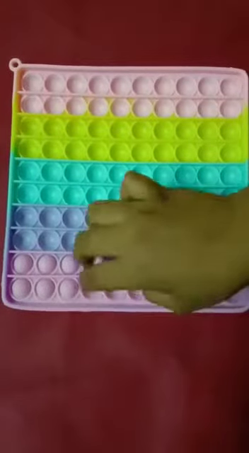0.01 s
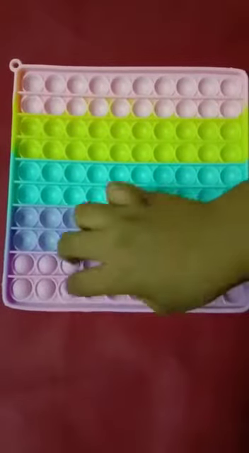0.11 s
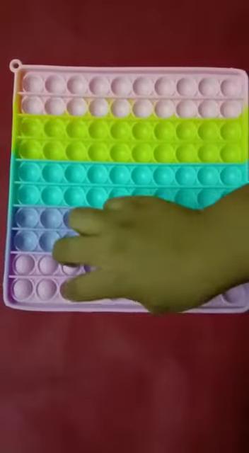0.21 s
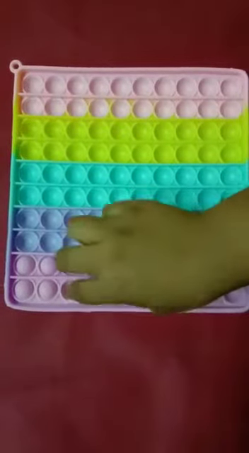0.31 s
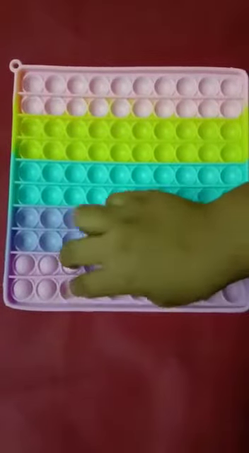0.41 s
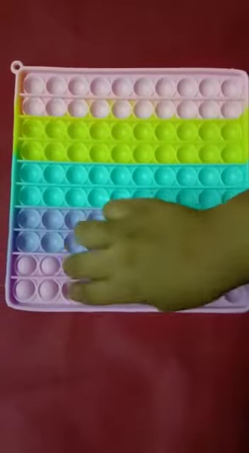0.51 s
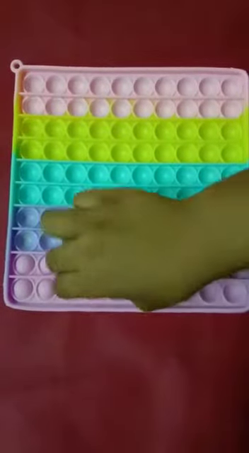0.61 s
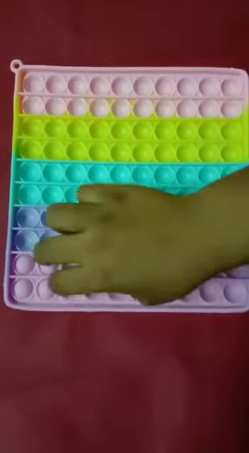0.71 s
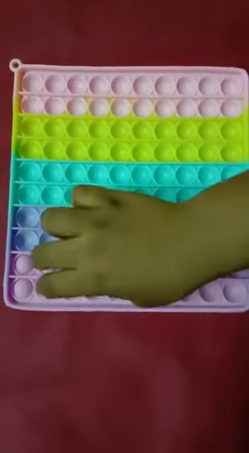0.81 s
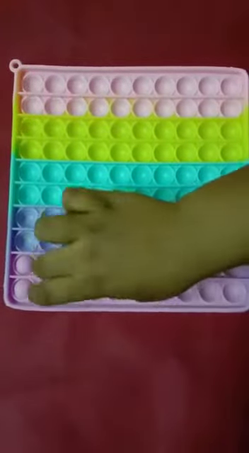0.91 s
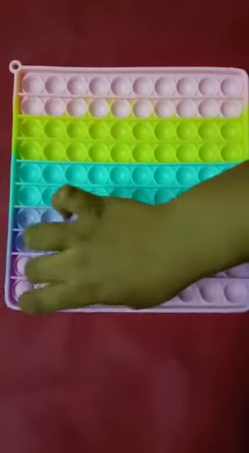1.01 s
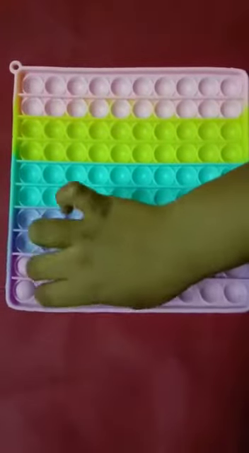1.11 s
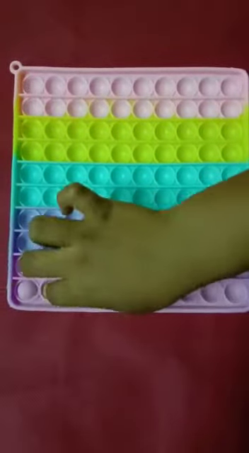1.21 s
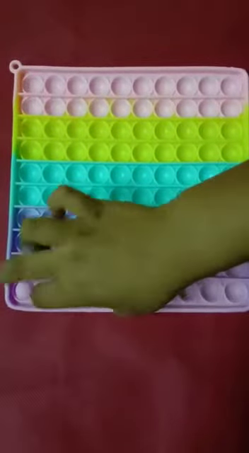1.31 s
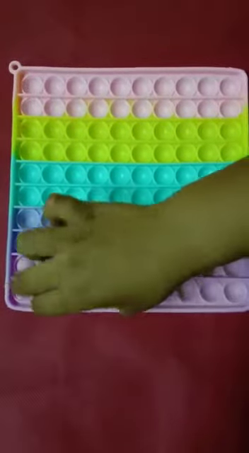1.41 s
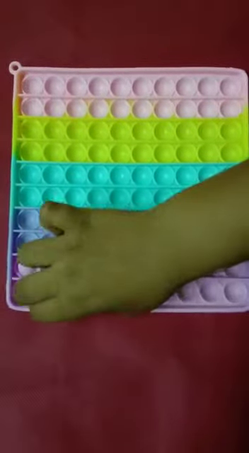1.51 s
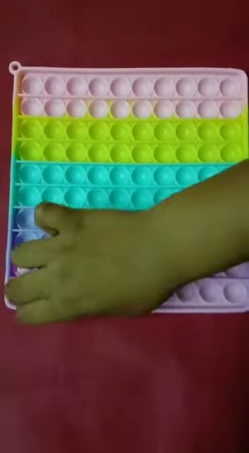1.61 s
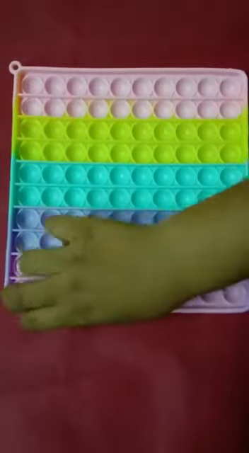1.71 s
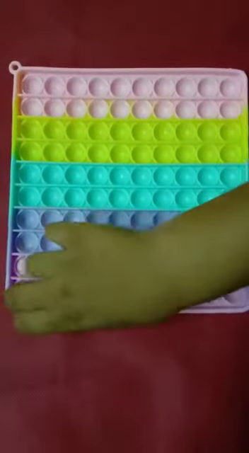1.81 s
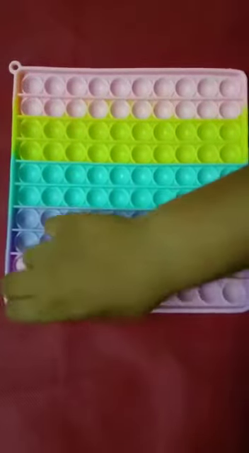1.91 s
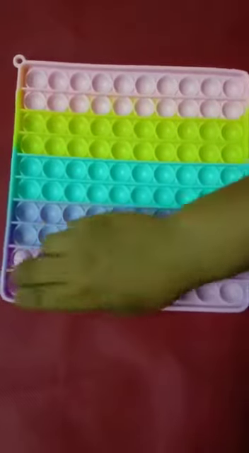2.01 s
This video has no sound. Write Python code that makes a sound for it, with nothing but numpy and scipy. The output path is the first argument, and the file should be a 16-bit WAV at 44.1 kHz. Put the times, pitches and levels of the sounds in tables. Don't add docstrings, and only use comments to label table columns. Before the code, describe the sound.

Five sharp pops of a silicone bubble toy pressed by fingers in a small room

```python
import sys
import numpy as np
from scipy import signal
from scipy.fft import rfft, irfft, next_fast_len
from scipy.io import wavfile
from scipy.ndimage import uniform_filter1d, map_coordinates

SR = 44100
rng = np.random.default_rng(int(sys.argv[2]) if len(sys.argv) > 2 else 0)


def generate_wav(sig):
    pcm = np.round(np.clip(np.atleast_2d(sig).T, -1, 1) * 32767).astype(np.int16)
    wavfile.write(sys.argv[1], SR, pcm)


def linear_from_db(decibels):
    return 10 ** (np.asarray(decibels, float) / 20)


N = 92610

# pitch_hz, level_db
RUMBLE_SPECTRUM = [(12, 5), (20, -27), (22, -37), (58, -25.5), (75, -4.5), (134, -4.5), (173, -12),
                   (318, -13.5), (700, -22.5), (910, -39), (1540, -120)]
# time_s, level_db
RUMBLE_LEVEL = [(0.0, -58), (0.4, -56.5), (0.99, -56), (1.65, -56), (1.96, -57), (2.1, -57.5)]
# pitch_hz, level_db
HISS_SPECTRUM = [(350, -30), (600, -4), (1610, -1.5), (1880, -1), (2680, -3), (3300, -3), (3780, -5),
                 (13900, -13.5), (16000, -8)]
# pitch_hz, level_db
PORT_SPECTRUM = [(12, -41.5), (20, -9.5), (286, -4.5), (1460, -16), (5530, -16.5), (6720, -18),
                 (7510, -58.5), (11400, -41.5), (15000, -46.5)]
# start_s, level_db, pitch_ratio, rebound_db, crackle_db
POPS = [
    (.2338, 0.5, 0.98, -15, -43.5),
    (.5234, -7, 0.96, -18, -48),
    (.9326, -1.5, 1.004, -7, -34),
    (1.1710, -3.5, 1.029, -38, -35.5),
    (1.8279, -12, 0.97, -19, -28),
]
TOUCH = [(-7.5, -9, 1, 0, -20), (0, -5.5, -0.35, -4, -8), (-1.5, -6, 1, 0, -33),
         (-3, -8.5, -4.3, -20.5, -27.5), (-2, -9, -0.8, -14, -4)]
# pitch_hz, t60_s, level_db
DOME_MODES = [(1075, .045, 0), (2280, .03, 0), (2830, .034, 0), (3800, .034, 0), (4600, .03, 0),
              (1330, .03, -6), (1740, .03, -1), (3350, .02, -17), (4200, .02, -14), (5200, .025, -6)]
NEAR_WALL_S = [.0104, .0104, .0104, .0088, .0102]
# extra_delay_s, level_db
FAR_WALLS = [(.0031, -4), (.0085, -7)]
# wall_db, room_db, room_t60_s, room_tilt_db_per_octave
ANSWERS = [
    (-24, -24, 0.29, 3.5),
    (-10, -20.5, 0.2, 0),
    (-15, -21, 0.24, -1.5),
    (-12.5, -30, 0.27, -4),
    (-12, -30.5, 0.21, -1.5),
]
# pitch_hz, level_db
ROOM_SPECTRUM = [(260, -62.5), (450, -25), (993, 1), (1510, 2), (1930, 6), (2550, 2), (3890, 1.5),
                 (4420, -1.5), (9500, -64.5), (12400, -129.5), (20900, -120)]
# start_s, level_db, pitch_hz, t60_s
THUDS = [(.234, -41, 184, .05), (.524, -48, 293.4, 0.12), (.535, -35.5, 108.5, 0.095),
         (.933, -43.5, 170, 0.087), (.933, -58.5, 303, 0.029), (1.171, -27.5, 299, 0.039),
         (1.171, -31, 650, .035), (1.828, -25.5, 171, 0.04), (1.828, -34.5, 460, 0.041),
         (1.84, -45.5, 67, 0.26), (.524, -42.5, 560, .03), (.234, -47, 600, .02), (.933, -48, 600, .02)]
# start_s, level_db, pitch_hz, t60_s
TICKS = [
    (.6350, -50, 3800, .012),
    (.6350, -54, 2900, .014),
    (.6350, -54, 4700, .012),
    (.660, -58, 3700, .03),
    (1.2728, -50, 3800, .016),
    (1.2728, -52, 1050, .03),
    (1.3055, -48, 3850, .022),
    (1.7730, -50, 2200, .018),
]
# middle_s, level_db, pitch_hz, rise_s, fall_s
RUBS = [(.848, -56, 2900, .008, .006), (.843, -58, 3800, .008, .004), (.848, -61, 5200, .01, .006),
        (1.454, -51, 4300, .009, .004), (1.453, -52, 2800, .011, .005), (1.71, -62, 4500, .012, .012),
        (1.71, -62, 2800, .01, .01), (1.98, -61, 1000, .015, .015), (2.05, -62, 1830, .012, .012),
        (1.385, -61, 1850, .012, .012)]
ATTACK_S, SWELL_S, START_SHARE = .00035, .0008, .62
FREE_S, DAMP_S, DAMPED_DB, REBOUND_S = .003, .0005, -17, .00117
CREST_S, LEAN = .00028, 1.1
LEAD_S = .003
VOICE_LOW_HZ, VOICE_HIGH_HZ = 710, 6370
CRACKLE_HZ, CRACKLE_T60 = 7500, 0.013
ROOM_START_S, ROOM_RISE_S, TREBLE_DIES_S = .0075, .004, 0.34
GATE_DB = -43
ROOM_KEEPS = 0.067
FLOOR_TOP_HZ = 15500


def unit(x):
    return x / np.sqrt(np.mean(x ** 2) + 1e-20)


def along(points, hz):
    f, v = np.transpose(points)
    return np.interp(np.log(hz + 1), np.log(f + 1), v)


def filtered(x, response):
    m = next_fast_len(len(x) + 8192)
    return irfft(rfft(x, m) * response(np.fft.rfftfreq(m, 1 / SR)), m)[:len(x)]


def peak(f, hz, width):
    return 1j * f * width / (hz * hz - f * f + 1j * f * width)


def bump(f, hz, width):
    return np.exp(-((f - hz) / width) ** 2)


def delayed(x, s):
    return np.pad(x, (round(s * SR), 0))[:len(x)]


def wobble(rate):
    knots = rng.standard_normal(int(N * rate / SR) + 4)
    return map_coordinates(knots, [np.arange(N) * rate / SR])


def rush(spectrum, patchy_db):
    z = signal.stft(rng.standard_normal(N), nperseg=512)[2]
    patches = uniform_filter1d(rng.standard_normal(z.shape), size=5, axis=0)
    patches = uniform_filter1d(patches, size=8, axis=1)
    x = signal.istft(z * linear_from_db(patchy_db * unit(patches)), nperseg=512)[1][:N]
    return unit(filtered(x, lambda f: linear_from_db(along(spectrum, f))))


def add(out, s, x):
    part = out[round(s * SR):][:len(x)]
    part += x[:len(part)]


def room_tone():
    t = np.arange(N) / SR
    rumble_db = np.interp(t, *np.transpose(RUMBLE_LEVEL)) + .8 * wobble(14)
    rumble = linear_from_db(rumble_db) * rush(RUMBLE_SPECTRUM, patchy_db=1.3)
    hiss = filtered(rush(HISS_SPECTRUM, patchy_db=2.33), lambda f: f < FLOOR_TOP_HZ)
    hiss = linear_from_db(-60 + .6 * wobble(3.1)) * hiss
    whine = linear_from_db(-75 + 5 * wobble(11)) * np.sin(2 * np.pi * 1820 * t + 3 * wobble(22))
    side = linear_from_db(-65) * rush(PORT_SPECTRUM, patchy_db=2.4)
    return rumble + hiss + whine + np.array([side, -side])


def dome_snap(t, modes, rebound_db, crackle_db):
    ring = sum(linear_from_db(g - 60 * t / t60) * np.cos(2 * np.pi * hz * (t - CREST_S) + LEAN) for hz, t60, g in modes)
    ring = ring * np.sin(np.pi / 2 * np.minimum(t / ATTACK_S, 1)) ** 2
    ring = ring * (1 - START_SHARE * np.exp(-t / SWELL_S))
    damping = linear_from_db(DAMPED_DB) + 1 / (1 + np.exp(np.minimum((t - FREE_S) / DAMP_S, 50)))
    snap = damping * (ring + linear_from_db(rebound_db) * delayed(ring, REBOUND_S))

    def voice_band(f):
        return 1 / (1 + (f / VOICE_HIGH_HZ) ** 14) / (1 + (VOICE_LOW_HZ / (f + 1)) ** 8)

    snap = filtered(delayed(snap, LEAD_S), voice_band)
    crackle = linear_from_db(-60 * t / CRACKLE_T60) * rng.standard_normal(len(t))
    crackle = filtered(delayed(crackle, LEAD_S), lambda f: bump(f, CRACKLE_HZ, 1300))
    return snap / np.abs(snap).max() + linear_from_db(crackle_db + 10) * crackle


def wall_echo(snap, near_s, wall_db):
    walls = [(0.0007, 0.056)] + FAR_WALLS
    return filtered(snap, lambda f: linear_from_db(wall_db) * sum(
        linear_from_db(g) * np.exp(-2j * np.pi * f * (near_s + d)) for d, g in walls))


def room_answer(t, modes, room_db, t60, tilt_db):
    level = linear_from_db(room_db - 60 * t / t60)
    onset = 0.48 * np.minimum(t / FREE_S, 1)
    level *= np.clip((t - ROOM_START_S) / ROOM_RISE_S, onset, 1)
    level /= 1 + linear_from_db(GATE_DB + 60 * t / t60 - room_db) ** 3

    def colour(f):
        tint = sum(linear_from_db(g) * np.abs(peak(f, hz, 510)) for hz, _, g in modes) ** ROOM_KEEPS
        return tint * linear_from_db(along(ROOM_SPECTRUM, f) + tilt_db * np.log2((f + 50) / 2000))

    air = unit(filtered(rng.standard_normal(len(t)), colour))
    dull = unit(filtered(air, lambda f: 1 / (1 + 1j * f / 1500)))
    bright_share = np.exp(-t / TREBLE_DIES_S)
    return level * (bright_share * air + (1 - bright_share) * dull)


def pops():
    out, t = np.zeros(N), np.arange(SR // 4) / SR
    for pop, touch, near_s, answer in zip(POPS, TOUCH, NEAR_WALL_S, ANSWERS):
        s, db, ratio, rebound_db, crackle_db = pop
        wall_db, room_db, t60, tilt_db = answer
        shares = list(touch) * 2
        modes = [(ratio * hz, life, g + share) for (hz, life, g), share in zip(DOME_MODES, shares)]
        snap = linear_from_db(db) * dome_snap(t, modes, rebound_db, crackle_db)
        add(out, s - LEAD_S, snap + wall_echo(snap, near_s, wall_db))
        add(out, s, room_answer(t, modes, room_db, t60, tilt_db))
    return out


def table():
    out, t = np.zeros(N), np.arange(SR // 4) / SR
    for s, db, hz, t60 in THUDS:
        add(out, s, linear_from_db(db - 60 * t / t60) * np.sin(2 * np.pi * hz * t) * (1 - np.exp(-t / .002)))
    noise = rng.standard_normal(len(t))
    bright = unit(filtered(noise, lambda f: peak(f, 12800, 6000) ** 2 * (f < FLOOR_TOP_HZ)))
    burst = linear_from_db(9 - 60 * t / .02) * (1 - np.exp(-t / .001))
    add(out, 1.828, linear_from_db(-60) * (linear_from_db(-60 * t / .25) + burst) * bright)
    return out


def skin():
    out, t = np.zeros(N), np.arange(SR // 10) / SR
    rise_in = 1 - np.exp(-t / .0007)
    for s, db, hz, t60 in TICKS:
        grit = unit(filtered(rng.standard_normal(len(t)), lambda f: bump(f, 3200, 1500)))
        grit = .9 * linear_from_db(-60 * t / .018) * rise_in * grit
        tone = 1.5 * linear_from_db(-60 * t / t60) * np.sin(2 * np.pi * hz * t) * rise_in
        add(out, s, linear_from_db(db) * (tone + grit))
    u = t - t[-1] / 2
    for s, db, hz, rise, fall in RUBS:
        grain = unit(filtered(rng.standard_normal(len(t)), lambda f: peak(f, hz, .13 * hz) ** 2))
        stroke = np.exp(-(u / np.where(u < 0, rise, fall)) ** 2)
        add(out, s - t[-1] / 2, linear_from_db(db) * grain * stroke)
    return out


def scene():
    return room_tone() + pops() + table() + skin()


def roll_off(x):
    return signal.sosfilt(signal.butter(12, 16460, fs=SR, output="sos"), x)


def record(dry):
    return roll_off(np.clip(dry, -1, 1))


dry = scene()
out = record(dry)
generate_wav(out)
```